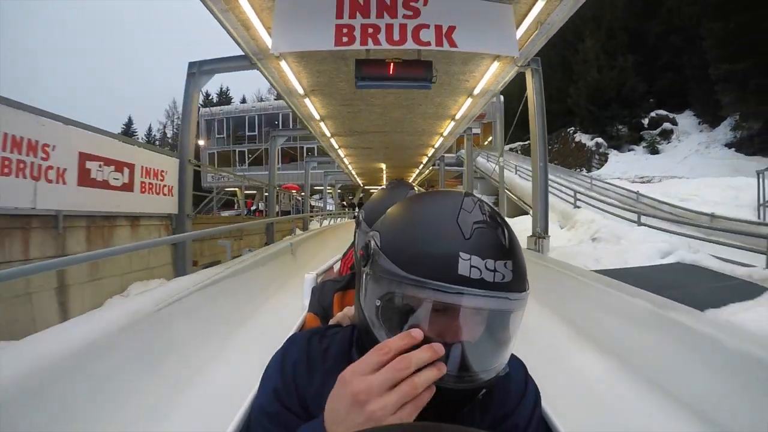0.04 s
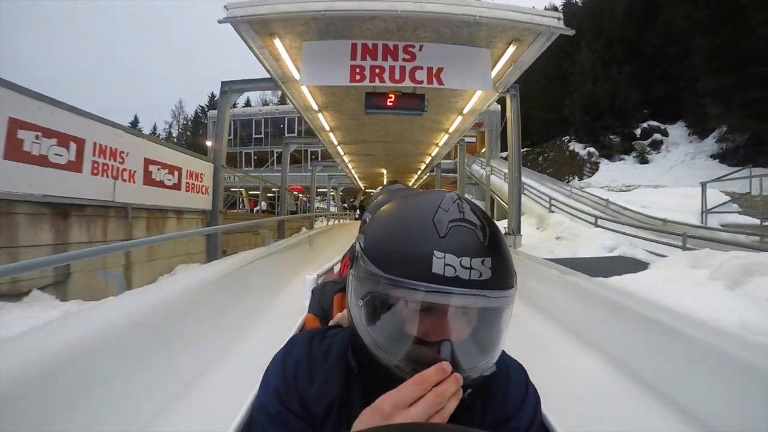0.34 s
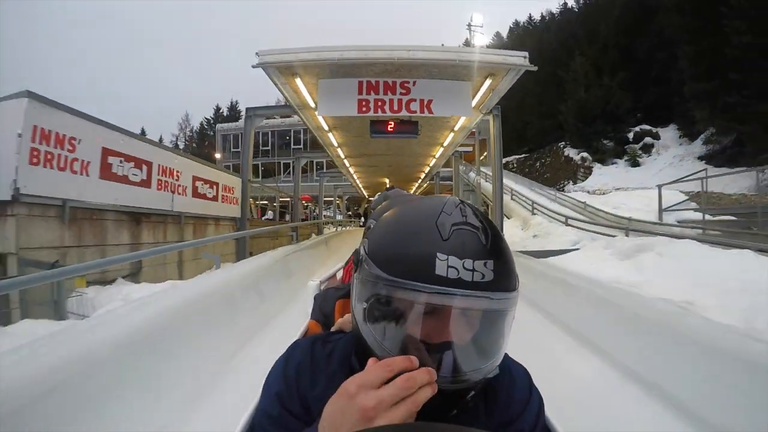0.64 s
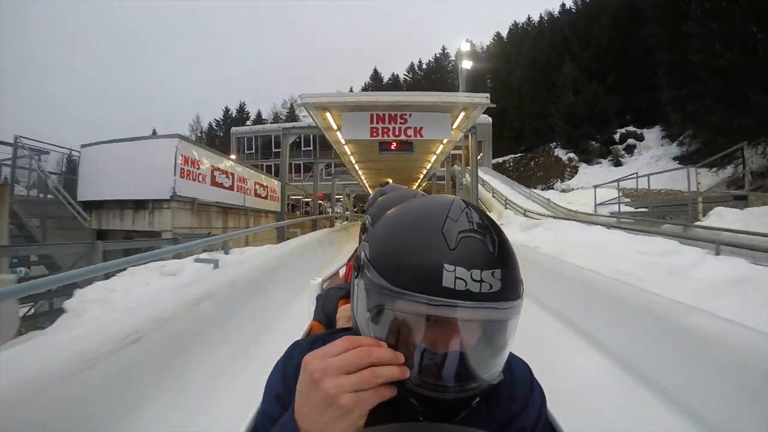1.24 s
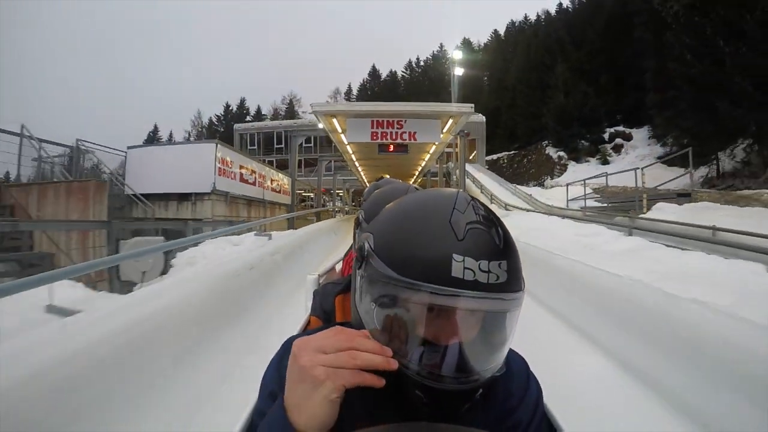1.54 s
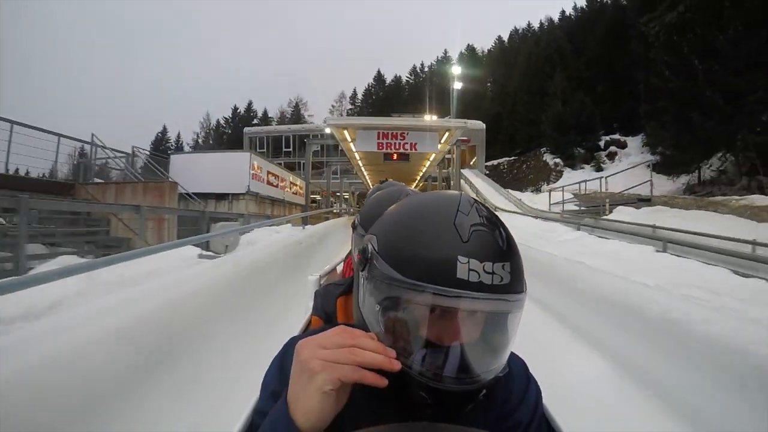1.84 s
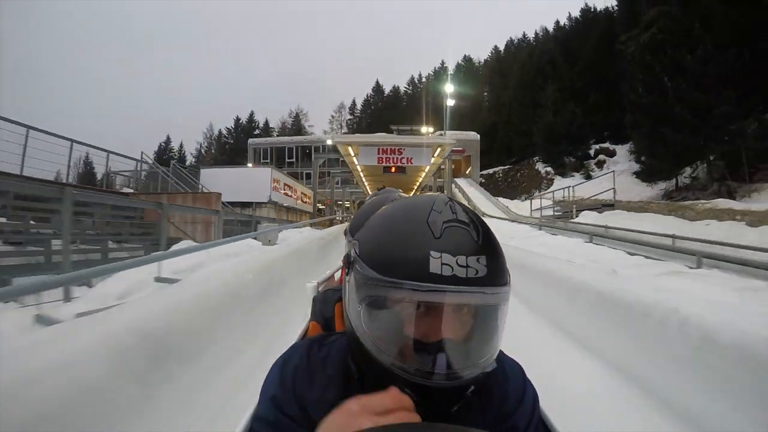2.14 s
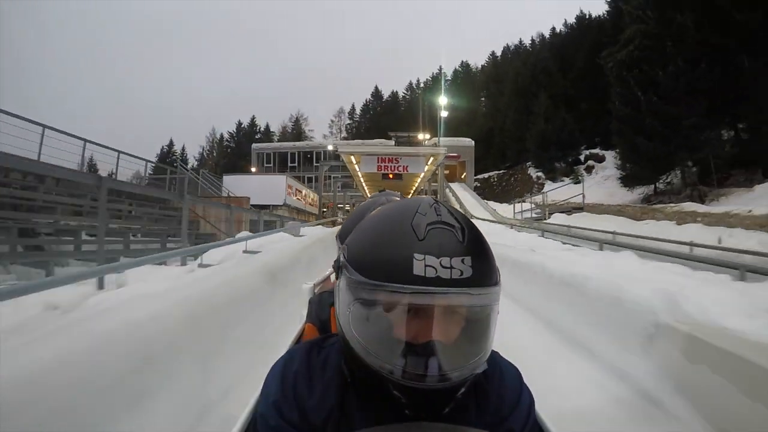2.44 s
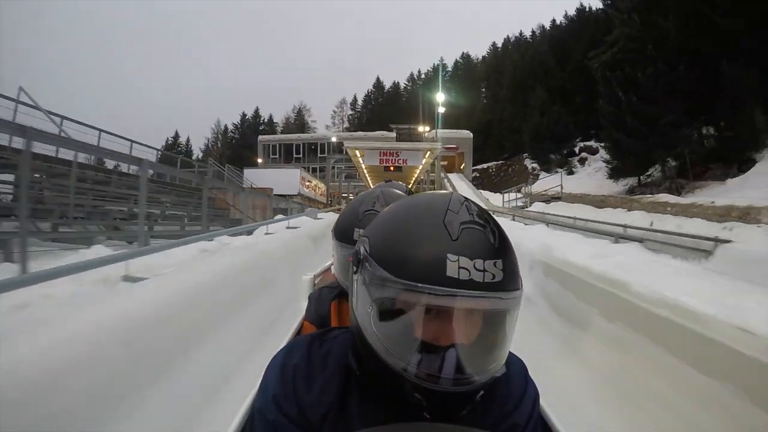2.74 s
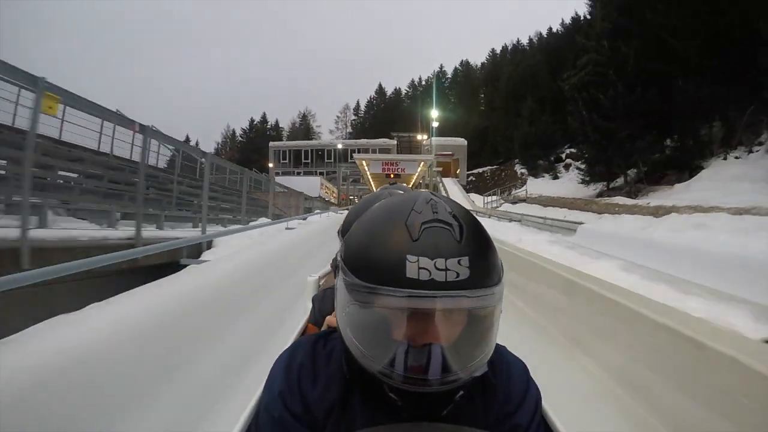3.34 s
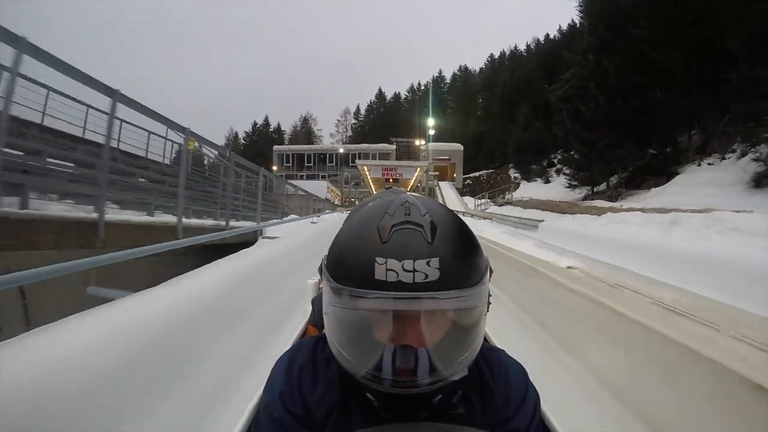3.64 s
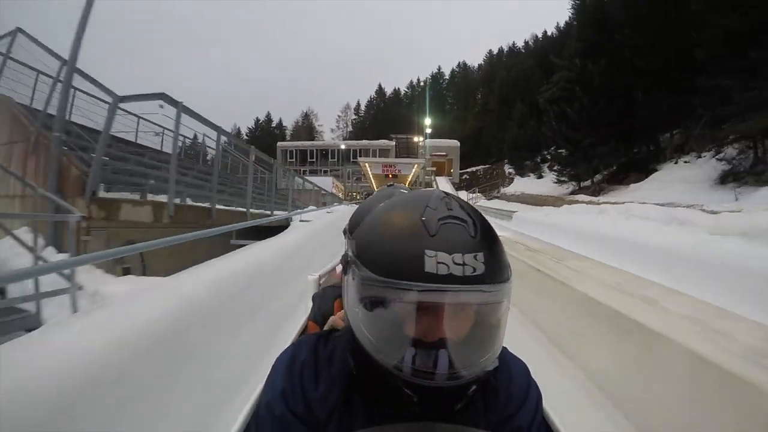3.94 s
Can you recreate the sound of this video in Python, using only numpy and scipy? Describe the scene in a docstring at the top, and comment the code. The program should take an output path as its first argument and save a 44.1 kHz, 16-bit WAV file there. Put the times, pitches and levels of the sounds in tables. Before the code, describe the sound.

A bobsled slides down an ice track with a deep, pulsing boom, heard close from on board. Knocks, hollow thuds, metal clanks and sharp ticks come thicker as the hiss of the runners grows with speed.

```python
"""Bobsled run, heard from the nose

Uneven ice makes the hull boom near 100 Hz. Each jolt knocks the shell and sets loose fittings
chattering; the hard ones add a metal clank or a hollow panel thud, and a few sharp ticks stand out.
Underneath, the runners scrape and hiss, the hiss growing as the sled gathers speed.
It all arrives through the two ports of a small camera fixed to the sled."""
import sys
import numpy as np
from scipy import signal
from scipy.fft import rfft, irfft, next_fast_len
from scipy.io import wavfile
from scipy.ndimage import uniform_filter1d, minimum_filter1d

SR = 44100
rng = np.random.default_rng(int(sys.argv[2]) if len(sys.argv) > 2 else 0)


def waveform_to_disk(signal):
    """Save audio, clipped to [-1, 1], as 16-bit WAV at the path in sys.argv[1]."""
    frames = np.transpose(np.atleast_2d(signal))
    scaled = np.clip(frames, -1, 1) * 32767
    samples = np.round(scaled).astype(np.int16)
    wavfile.write(sys.argv[1], SR, samples)


N = 176400
SIZE = next_fast_len(N + SR // 4, True)
FREQS = np.arange(SIZE // 2 + 1) * SR / SIZE
TIME = np.arange(N) / SR

# Cue levels are ahead of the faders and EQ.
# swells of the hull's boom: t/s, level/dB
BOOM_SWELLS = [(0.0, -10), (0.03, -24.5), (0.07, -12.5), (0.18, -23), (0.24, -13), (0.34, -22), (0.36, -20),
               (0.5, -27.5), (0.6, -11.5), (0.62, -24.5), (0.7, -11), (0.73, -23), (0.96, -14.5),
               (1.01, -19), (1.05, -14.5), (1.14, -28), (1.19, -14), (1.29, -28), (1.31, -15.5),
               (1.34, -28), (1.38, -10.5), (1.4, -24), (1.66, -14), (1.69, -29.5), (1.77, -13),
               (1.96, -21.5), (1.98, -40), (2.02, -12), (2.08, -25), (2.13, -14), (2.21, -15.5),
               (2.26, -28), (2.28, -18), (2.38, -13.5), (2.46, -21.5), (2.48, -13), (2.63, -21), (2.66, -9),
               (2.68, -27), (2.73, -14.5), (2.8, -17.5), (3.04, -17.5), (3.07, -13), (3.12, -26),
               (3.14, -16), (3.39, -15), (3.43, -11), (3.45, -23), (3.5, -14.5), (3.58, -19.5), (3.93, -12),
               (4.0, -18.5)]
# jolts: t/s, chatter length/s, knock/dB, clatter/dB, metal/dB,
# centre of a faint, arbitrary tint in the clatter f/Hz, unscaled leftward pan/dB
JOLTS = [(0.011, 0.035, -49, -31, -61, 1440, -1), (0.059, 0.01, -13, -22.5, -28, 1700, -3.5),
         (0.091, 0.015, -15.5, -27.5, -41, 1660, 2), (0.13, 0.01, -19, -28, -37.5, 1740, -4),
         (0.164, 0.011, -24, -34, -44, 2150, 0), (0.202, 0.0091, -28, -28.5, -38, 2130, -7),
         (0.216, 0.0095, -15.5, -27.5, -56, 1830, -1), (0.33, 0.012, -21.5, -29, -66, 1400, -8),
         (0.548, 0.011, -21, -39.5, -50.5, 1520, -5), (0.582, 0.0083, -19, -37.5, -61, 1210, -10),
         (0.736, 0.0095, -25, -38.5, -56, 1410, -16), (0.958, 0.0096, -17.5, -23.5, -35, 2230, -2.5),
         (1.021, 0.0071, -40, -31.5, -57, 2670, 3), (1.157, 0.0072, -21.5, -34, -33, 1210, -6),
         (1.18, 0.0077, -16, -26, -45, 1960, 8), (1.204, 0.011, -28, -27.5, -39, 1530, -8),
         (1.239, 0.01, -33, -29, -35, 1800, 1), (1.353, 0.011, -14, -20.5, -39.5, 1850, -6),
         (1.37, 0.02, -23, -28.5, -45, 1330, 2), (1.411, 0.011, -16, -17.5, -37.5, 1320, -5),
         (1.425, 0.0054, -20, -36, -34, 1290, 3), (1.476, 0.015, -46, -26.5, -52, 1340, -8),
         (1.505, 0.005, -20, -30, -55, 1210, 18), (1.562, 0.01, -15, -22.5, -26, 1880, -9),
         (1.596, 0.014, -13, -21, -23.5, 1760, -2.5), (1.64, 0.024, -18, -26.5, -46, 2900, -6),
         (1.767, 0.012, -13, -20.5, -21.5, 2230, -6.5), (1.809, 0.012, -19.5, -29.5, -35.5, 1900, -1),
         (1.997, 0.033, -27, -24.5, -39, 2100, -10), (2.015, 0.013, -15, -19, -25, 3920, 14),
         (2.031, 0.013, -17.5, -21, -32.5, 2420, 4), (2.084, 0.0048, -25, -19, -24.5, 2020, 1),
         (2.274, 0.0097, -12, -28.5, -34, 1790, 0), (2.289, 0.0035, -29, -16, -27, 2540, 6),
         (2.315, 0.0075, -14.5, -20.5, -21, 1430, -8), (2.338, 0.018, -19, -24, -31, 1500, -3),
         (2.353, 0.012, -7.5, -21.5, -20.5, 1610, 0), (2.391, 0.0071, -13, -18.5, -23, 1750, -3),
         (2.425, 0.016, -34, -28, -35.5, 1200, -1), (2.445, 0.0098, -22, -22, -35, 2700, -4),
         (2.483, 0.015, -13, -21.5, -29.5, 1940, -7), (2.643, 0.0043, -10.5, -18.5, -33, 1950, 6),
         (2.657, 0.011, -23, -26, -40, 2630, 7), (2.709, 0.017, -12.5, -22, -24.5, 2260, -3),
         (2.724, 0.014, -15.5, -19, -22, 2920, 8), (2.752, 0.014, -13.5, -20.5, -26, 1420, 2),
         (2.792, 0.0078, -39, -26.5, -35, 1360, 0), (2.817, 0.012, -14.5, -24, -27, 2160, -3.5),
         (2.857, 0.017, -28, -24, -31.5, 1300, -4), (2.873, 0.0082, -53, -20, -32, 2100, -5),
         (2.907, 0.0053, -45, -18.5, -27, 2140, -2), (2.958, 0.006, -40, -22.5, -37, 1330, -5),
         (2.99, 0.017, -24, -32, -37.5, 1940, -4), (3.026, 0.0072, -16, -22, -26, 1360, -4.5),
         (3.061, 0.0098, -28, -16, -27, 1650, -7), (3.159, 0.0093, -16.5, -21.5, -32, 1430, -0.5),
         (3.205, 0.015, -43, -21.5, -31, 1440, -3), (3.221, 0.0115, -18, -28, -38, 1760, 2),
         (3.312, 0.014, -16, -22.5, -31.5, 2130, -5), (3.344, 0.015, -16, -24, -35.5, 1970, -5),
         (3.395, 0.0099, -45, -31.5, -37.5, 1180, 3), (3.425, 0.012, -20, -27, -35.5, 2100, -5),
         (3.467, 0.0068, -12.5, -30, -35, 1200, -1), (3.48, 0.0048, -4.5, -17, -23, 1950, -5),
         (3.519, 0.012, -19.5, -21, -22, 2430, -4.5), (3.541, 0.013, -8.5, -24.5, -27, 1240, 5),
         (3.55, 0.008, -24.5, -18.5, -21, 3260, -12), (3.585, 0.0076, -23, -20.5, -26.5, 1890, -3.5),
         (3.612, 0.021, -41, -24, -32, 1900, -3), (3.628, 0.024, -16, -24, -39, 1140, -2),
         (3.641, 0.013, -23.5, -27, -43, 1310, 11), (3.681, 0.0077, -33, -32, -36.5, 1370, -5),
         (3.746, 0.019, -19, -26, -41, 2500, 3), (3.794, 0.0078, -43, -15, -22.5, 1900, 3.5),
         (3.849, 0.016, -16, -26.5, -31, 1380, -1), (3.876, 0.0017, -39, -12.5, -28, 2400, 6),
         (3.913, 0.011, -15.5, -19, -18.5, 2420, -4.5), (3.944, 0.0091, -12.5, -26, -26.5, 1240, -4),
         (3.983, 0.013, -18, -29, -34.5, 1840, -5)]
# square blows on a metal fitting: t/s, level/dB, centre of the ring f/Hz
CLANKS = [(1.355, -26, 2760), (1.413, -25, 2730), (1.429, -27.5, 1400), (1.565, -26, 7600),
          (1.645, -27, 2230), (1.768, -33, 5500), (2.485, -27.5, 3330), (2.725, -19, 3450),
          (2.875, -30, 2800), (2.909, -26, 4260), (3.064, -23, 4000), (3.798, -22, 1920),
          (3.802, -26, 4660)]
# hollow thuds of the shell's panels: t/s, f/Hz, level/dB
THUDS = [(.062, 234, -22.5), (.098, 472, -32.5), (.22, 242, -21), (0.224, 392, -26), (.338, 440, -23.5),
         (0.586, 411, -25.5), (0.589, 263, -30.5), (.96, 308, -24.5), (1.369, 167.5, -18.5),
         (1.416, 266, -19.5), (1.419, 468, -19.5), (1.495, 177.4, -15.5), (1.589, 321, -28.5),
         (1.654, 450, -24), (1.77, 207, -19.5), (1.79, 334, -22.5), (2.025, 292.6, -22), (2.272, 550, -23),
         (2.299, 238, -19.5), (2.35, 497, -27), (2.376, 279, -25), (2.646, 319.4, -14.5), (2.665, 220, -18),
         (2.721, 289, -20), (2.723, 194, -16), (2.791, 529, -24), (3.135, 529, -24), (3.165, 444, -22.5),
         (3.199, 319, -19), (3.479, 245, -26), (3.61, 852, -22)]
# sharp hard contacts: t/s, click level/dB, snap level/dB
TICKS = [(0.2886, -32, -31), (0.97, -23, -36), (1.191, -12, -34), (1.2645, -24.5, -30), (1.563, -25, -9),
         (2.2001, -7.5, -17), (2.3147, -16.5, -11), (2.362, -19, -18), (2.392, -32, -12),
         (2.573, -20.5, -30), (2.859, -31, -18), (3.519, -16, -15), (3.615, -18, -33), (3.747, -19, -34)]
# runners on the ice: t/s, scrape level/dB, hiss level/dB
GLIDE = [(0, -29.5, -41), (.28, -38, -43), (.46, -34.5, -48.5), (.62, -31.5, -47), (.88, -31.5, -44.5),
         (1.12, -34.5, -40.5), (1.3, -34.5, -42.5), (1.55, -28.5, -37), (1.92, -37, -39),
         (2.24, -34.5, -34.5), (2.6, -36.5, -35.5), (2.8, -34, -40.5), (3.0, -32.5, -38),
         (3.25, -30.5, -33.5), (3.42, -30, -36.5), (3.7, -28.5, -36.5), (4, -30.5, -37)]
# modes of the fittings: f/Hz, t60/s, relative level/dB
FITTING_MODES = [(940, 0.081, -2.5), (1389, 0.16, -2), (1859, 0.1, 2.5), (1980, 0.12, -3), (2787, 0.08, 7),
                 (3355, 0.073, 0), (3974, 0.091, -3.5), (4560, 0.066, -9.5), (5085, 0.11, -5),
                 (6080, 0.076, -2), (7240, 0.13, -6)]
# EQ curve of each layer: f/Hz, relative level/dB
BOOM_EQ = [(8, -13.5), (15, -3), (28, -25), (45, -22), (58, -5), (80, -5.5), (102, -0.5), (122, -6.5),
           (145, -13.5), (175, -20.5), (260, -30), (500, -80)]
KNOCK_EQ = [(90, -14.5), (170, -0.5), (300, -2.5), (400, -3.5), (480, -1.5), (650, -9.5), (870, -4.5),
            (1200, -10), (2500, -56)]
CLATTER_EQ = [(400, -38.5), (850, -0.5), (1300, 2), (1550, 0), (1950, 1), (2500, -1.5), (2800, -6.5),
              (3100, -8), (4000, -6.5), (4800, -16), (7000, -40), (12000, -60)]
METAL_EQ = [(2000, -26), (3800, -6), (4800, -8), (5500, 1.5), (6800, 4.5), (8000, -2.5), (9400, -7),
            (10500, -16), (12000, -28.5), (13500, -32), (15000, -45)]
TICK_EQ = [(500, 0.5), (1500, 14), (2400, 11.5), (4000, -4), (7000, 4), (9500, -8.5), (12000, -20),
           (15000, -38)]
SCRAPE_EQ = [(90, -23), (170, -5), (300, 0.5), (400, -3), (480, 0), (650, -8.5), (870, -1.5), (1100, -5),
             (1500, -15.5), (2200, -24.5), (4000, -49)]
HISS_EQ = [(700, -39), (1400, 10), (2000, -1.5), (3000, -1.5), (4700, -7), (6800, -2.5), (8500, -7.5),
           (10000, -12.5), (12800, -26), (14500, -70)]
# phase between the camera's ports: f/Hz, lead of the left/rad
PORT_PHASE = [(0, 0), (750, 0.2), (1050, 4), (1400, 4), (1800, 0.58), (2500, 1.5), (2800, -2), (3400, 1.42),
              (4500, 0.1), (5600, -2), (7200, -2), (9300, -2), (10300, -4.5)]
# balance between the ports: f/Hz, left minus right/dB
PORT_BALANCE = [(60, -2), (180, -1.5), (400, -0.5), (600, -1), (900, -4), (1400, -5), (2000, -2),
                (2800, -0.5), (4000, 0.5), (5000, 4), (6200, 0), (7100, -2.5), (8200, -11), (10000, -8.5),
                (12000, -4)]

BOOM_DB, KNOCK_DB, CLATTER_DB, METAL_DB, THUD_DB = 0.5, -3.5, -1, -0.5, 2  # faders
CLICK_DB, SNAP_DB, SCRAPE_DB, HISS_DB = 4, 1.5, 3, -4
BOOM_EVENNESS, CHATTER_EVENNESS = 0.59, 0.5  # 0 untouched, 1 flat
LEAD_S, ATTACK_S, RELEASE_S = 0.01, 0.002, 0.004  # chatter envelope
GRAINS_PER_S, GRAIN_SCATTER_DB, PAN_CENTRE_DB = 1500, 4.2, 1.5
TINT_DB, TINT_T60_S = -18, 0.018
MODE_SCATTER_DB, MODE_DETUNE, CLANK_SPREAD_OCTAVES = 1.5, 0.01, 0.6
THUD_RISE_S, THUD_T60_S, TICK_DECAY_S = 0.0067, 0.14, 0.00065
GRIT_PER_S, GRIT_SCATTER_DB, GRIT_DB = 70, 4, -6
CEILING, TOP_HZ = 0.9, 15000


def hull():
    """Uneven ice shakes the hull's low resonances, which swell and sink with the bumps."""
    boom = unit(eq(noise_pair(apart_db=-14), BOOM_EQ))
    power = np.mean(np.abs(signal.hilbert(boom)) ** 2, axis=0)
    envelope = np.sqrt(uniform_filter1d(power, size=700))
    compressed = unit(boom / envelope ** BOOM_EVENNESS)
    return compressed * undb(ride(BOOM_SWELLS, column=1) + BOOM_DB)


def rattles():
    """Every jolt gives a dull knock, a noisy clatter of fittings and a bright metal edge."""
    knocks, clatter, metal = np.zeros((3, 2, N))
    for cue, length, knock_db, clatter_db, metal_db, tint_hz, pan_db in JOLTS:
        start = cue - LEAD_S  # the chatter builds just ahead of the main contact
        pan = pan_db - PAN_CENTRE_DB
        tint = undb(TINT_DB) * mode(TIME[:SR // 8], tint_hz, TINT_T60_S)
        body = shell(tail_db=-3.5, t60=0.13) + fittings(db=-14) + tint
        edge = shell(tail_db=-10, t60=0.099) + fittings(db=-6)
        hollow = shell(tail_db=3, t60=0.37)
        add(knocks, start, undb(KNOCK_DB + knock_db) * chatter(length, hollow, 0, apart_db=-10))
        add(clatter, start, undb(CLATTER_DB + clatter_db) * chatter(length, body, 0.94 * pan, -6))
        add(metal, start, undb(METAL_DB + metal_db) * chatter(length, edge, 0.67 * pan, -8))
    return eq(narrow(knocks, width=0.39), KNOCK_EQ) + eq(clatter, CLATTER_EQ) + eq(metal, METAL_EQ)


def chatter(length, response, pan_db, apart_db):
    """A cluster of tiny contacts builds, holds and dies away, exciting a ringing body."""
    t = TIME[:SR // 18] - LEAD_S
    attack = np.minimum(t - ATTACK_S, 0) / ATTACK_S
    release = np.maximum(t - length + ATTACK_S, 0) / RELEASE_S
    fade = np.exp((attack - release) / 2)  # applied before and after whitening
    grains = np.repeat(rng.standard_normal(len(t)), SR // GRAINS_PER_S)[:len(t)]
    noise = rng.standard_normal(len(t)) + undb(apart_db) * rng.standard_normal((2, len(t)))
    contacts = fade * whiten(fade * undb(GRAIN_SCATTER_DB * grains) * noise)
    sound = unit_energy(signal.fftconvolve(contacts, response, axes=1))
    pan_gains = unit(undb(np.array([[pan_db], [-pan_db]]) / 2))
    return sound * np.sqrt((length + ATTACK_S) * SR) * pan_gains


def shell(tail_db, t60):
    """The shell struck at one spot: the blow itself and a short, dense ring."""
    t = TIME[:SR // 8]
    response = undb(tail_db) * unit_energy(rng.standard_normal((2, len(t))) * decay(t, t60))
    response[:, 0] += 1
    return response


def fittings(db, centre_hz=None):
    """Loose metal rings, seated differently at each blow; a square hit favours modes near one pitch."""
    t, ring = TIME[:SR // 8], 0
    for hz, t60, level in FITTING_MODES:
        favour = np.exp(-0.5 * (np.log2(hz / centre_hz) / CLANK_SPREAD_OCTAVES) ** 2) if centre_hz else 1
        strength = rng.choice([-1, 1]) * undb(level + MODE_SCATTER_DB * rng.standard_normal())
        detuned_hz = hz * (1 + MODE_DETUNE * rng.standard_normal())
        ring = ring + favour * strength * mode(t, detuned_hz, t60)
    return undb(db) * unit_energy(ring)


def mode(t, hz, t60):
    """One fading partial that reaches each port in its own phase."""
    phase = rng.uniform(-0.55, 1, (2, 1))
    return unit_energy(np.cos(2 * np.pi * hz * t + phase) * decay(t, t60))


def clanks():
    """Square blows make a metal fitting ring out briefly."""
    out = np.zeros((2, N))
    for start, db, hz in CLANKS:
        add(out, start, np.sqrt(SR // 100) * fittings(db, centre_hz=hz))  # energy of 10 ms at this level
    return out


def thuds():
    """Hard bumps make one panel of the shell ring briefly, with an unsteady pitch."""
    out, t = np.zeros((2, N)), TIME[:SR // 6]
    envelope = np.minimum(t / THUD_RISE_S, 1) * decay(np.maximum(t - 2 * THUD_RISE_S, 0), THUD_T60_S)
    for start, hz, db in THUDS:
        drift = uniform_filter1d(rng.standard_normal(len(t)), size=300)
        wobble_rad = unit(uniform_filter1d(drift, size=150))
        add(out, start, undb(THUD_DB + db) * envelope * np.sin(2 * np.pi * hz * t + wobble_rad))
    return out


def ticks():
    """Hard contacts close to the camera: a click and a bright snap, almost dry."""
    clicks, snaps = np.zeros((2, 2, N))
    t = TIME[:SR // 100]
    fade = np.exp(-t / TICK_DECAY_S / 2)
    for start, click_db, snap_db in TICKS:
        for track, db in ((clicks, CLICK_DB + click_db), (snaps, SNAP_DB + snap_db)):
            burst = fade * whiten(fade * rng.standard_normal((1, len(t))))
            contact = unit_energy(burst) * np.sqrt(TICK_DECAY_S * SR / 2)
            tick = signal.fftconvolve(contact, shell(tail_db=-12, t60=0.036), axes=1)
            add(track, start, undb(db) * tick)
    return eq(clicks, TICK_EQ) + eq(snaps, METAL_EQ)


def runners():
    """Steel on ice lays the bed: a rough low scrape, a fine hiss and crackling grit."""
    scrape = eq(noise_pair(apart_db=-4) * unit(undb(1.4 * flutter(70))), SCRAPE_EQ)
    hiss = eq(noise_pair(apart_db=3.5) * unit(undb(2.1 * flutter(60) + flutter(740))), HISS_EQ)
    scrape_gain = undb(ride(GLIDE, column=1) + SCRAPE_DB)
    hiss_gain = undb(ride(GLIDE, column=2) + HISS_DB)
    return scrape * scrape_gain + (hiss + undb(GRIT_DB) * grit()) * hiss_gain


def grit():
    """Crumbs of ice crack under the runners: small ticks at random moments."""
    cracks = rng.random(N) < GRIT_PER_S / SR
    crumbs = cracks * undb(GRIT_SCATTER_DB * np.clip(rng.standard_normal(N), -2, 2))
    crackle = signal.fftconvolve(crumbs[None], shell(tail_db=4, t60=0.016), axes=1)[:, :N]
    return unit(eq(crackle, HISS_EQ))


def noise_pair(apart_db):
    """Noise common to both ports plus a part that each has alone."""
    return unit(rng.standard_normal(N) + undb(apart_db) * rng.standard_normal((2, N)))


def flutter(rate):
    """Glide to a new random value, rate times a second; rms 1."""
    step = SR // rate
    return unit(uniform_filter1d(np.repeat(rng.standard_normal(N // step + 1), step), step)[:N])


def decay(t, t60):
    """A tail that falls 60 dB in t60 seconds."""
    return np.exp(-np.log(1000) * t / t60)


def ride(table, column):
    """A fader ride: one column of a cue table at every sample."""
    rows = np.array(table)
    return np.interp(TIME, rows[:, 0], rows[:, column])


def over_frequency(table):
    """A table of f/Hz, level/dB at every frequency."""
    hz, db = np.array(table).T
    return np.interp(np.log(FREQS + 1), np.log(hz), db)


def eq(x, table):
    """Minimum-phase EQ; white noise keeps its power."""
    cepstrum = irfft(np.log(unit(undb(over_frequency(table)))), SIZE)
    cepstrum[1:SIZE // 2] *= 2
    cepstrum[SIZE // 2 + 1:] = 0
    return irfft(rfft(x, SIZE) * np.exp(rfft(cepstrum)), SIZE)[..., :N]


def whiten(x):
    """Partly flatten the spectrum of a cluster of contacts so it has no pitch of its own."""
    spectrum = rfft(x)
    power = np.mean(np.abs(spectrum) ** 2, axis=0)
    return irfft(spectrum / (power + 1e-12) ** (CHATTER_EVENNESS / 2), x.shape[-1])


def narrow(pair, width):
    """Pull the stereo image towards the centre."""
    mid = pair.mean(axis=0)
    return mid + width * (pair - mid)


def limit(x):
    """Duck both channels for a few milliseconds around peaks above the ceiling."""
    gain = CEILING / np.maximum(np.abs(x).max(axis=0), CEILING)
    return x * uniform_filter1d(minimum_filter1d(gain, size=161), size=161)


def add(track, start, sound):
    """Mix a sound into a stereo track at a time in seconds."""
    i = int(np.clip(start * SR, 0, N - 1))
    track[:, i:i + sound.shape[-1]] += sound[..., :N - i]


def undb(db):
    """Decibels to gain."""
    return 10 ** (np.asarray(db) / 20)


def unit(x):
    """Scale to rms 1."""
    return x / np.sqrt(np.mean(x ** 2))


def unit_energy(x):
    """Scale each channel to energy 1."""
    return x / np.sqrt(np.sum(x ** 2, axis=-1, keepdims=True))


def scene():
    """The mix: boom and runners throughout, with the impacts on top."""
    return hull() + runners() + rattles() + clanks() + thuds() + ticks()


def record(dry):
    """The housing gives each port its own level and phase; a limiter and a high cut follow."""
    hz, radians = np.array(PORT_PHASE).T
    lead = np.interp(FREQS, hz, radians)
    balance = over_frequency(PORT_BALANCE)
    gains = undb(np.array([balance, -balance]) / 2)
    gains /= np.sqrt(np.mean(gains ** 2, axis=0))
    ports = gains * np.exp(1j * np.array([lead, -lead]) / 2)
    heard = irfft(rfft(dry, SIZE) * ports, SIZE)[:, :N]
    high_cut = signal.ellip(8, 0.2, 70, TOP_HZ, fs=SR, output="sos")
    return signal.sosfilt(high_cut, limit(heard))


dry = scene()
out = record(dry)
waveform_to_disk(out)
```